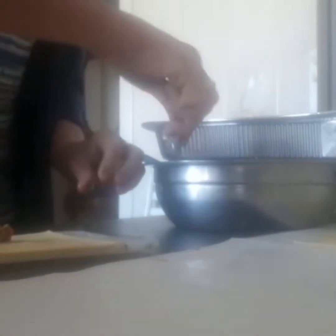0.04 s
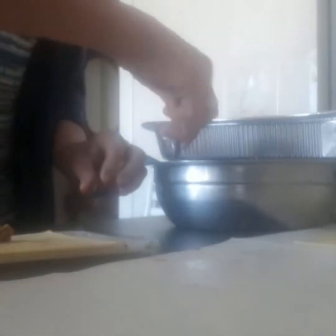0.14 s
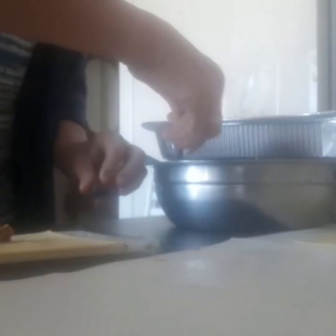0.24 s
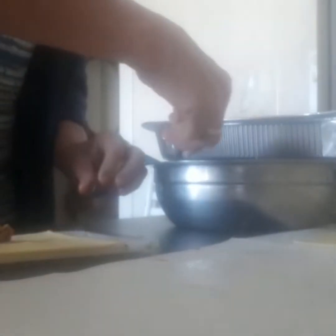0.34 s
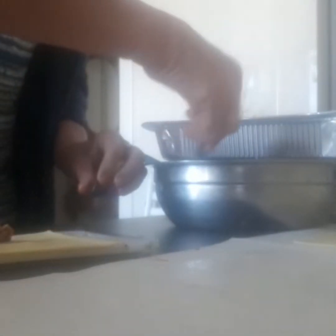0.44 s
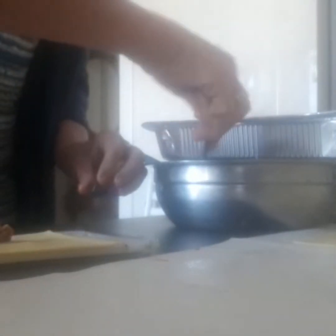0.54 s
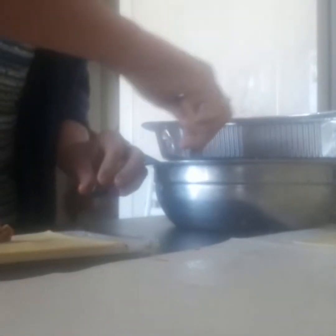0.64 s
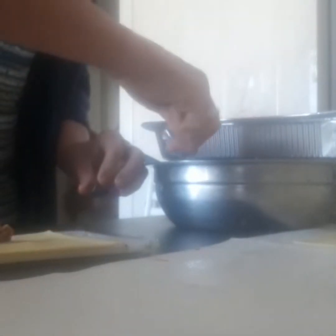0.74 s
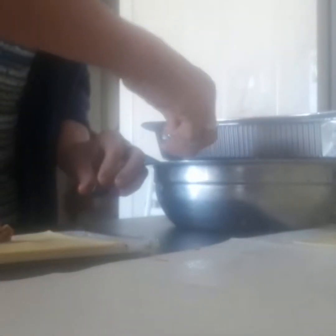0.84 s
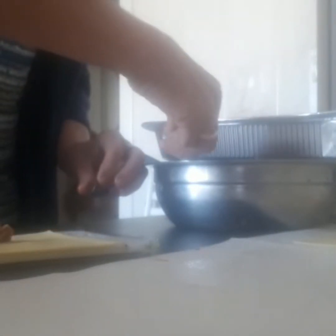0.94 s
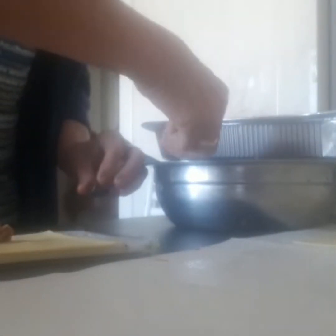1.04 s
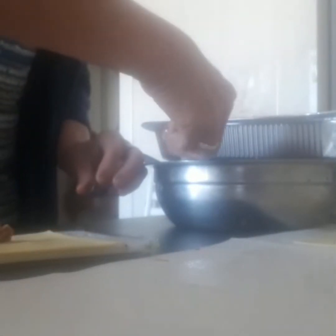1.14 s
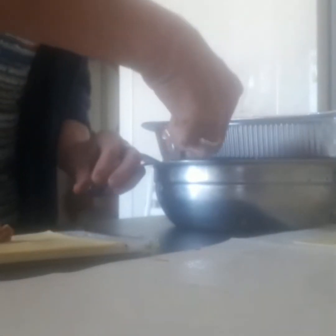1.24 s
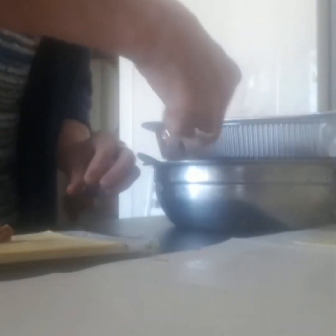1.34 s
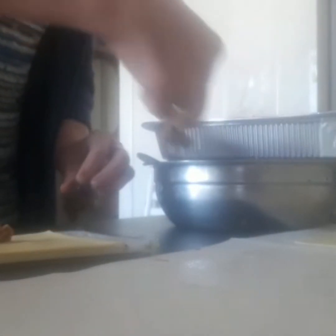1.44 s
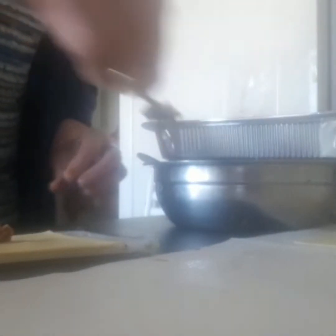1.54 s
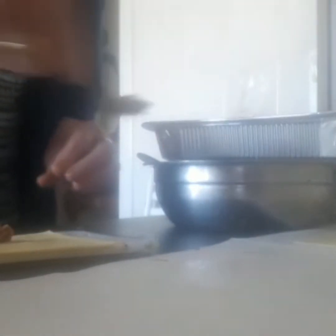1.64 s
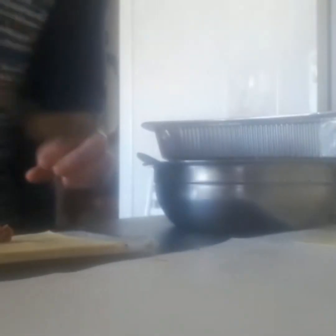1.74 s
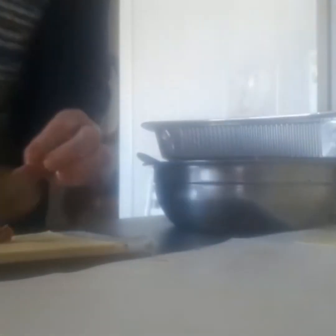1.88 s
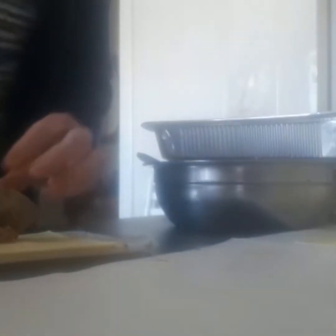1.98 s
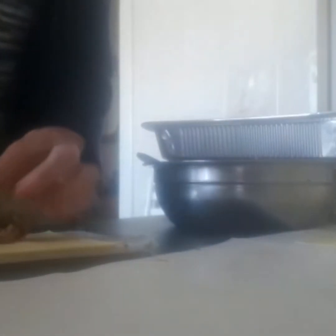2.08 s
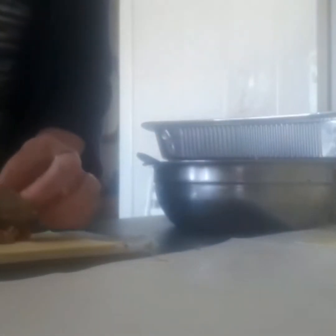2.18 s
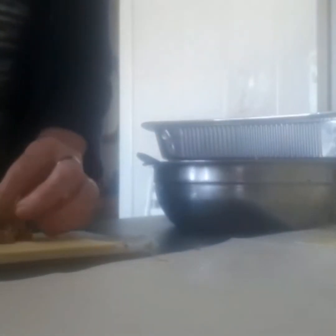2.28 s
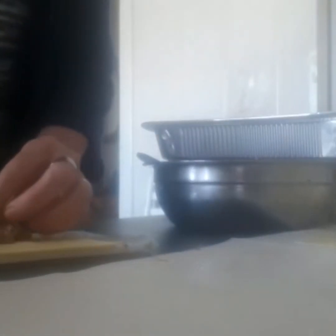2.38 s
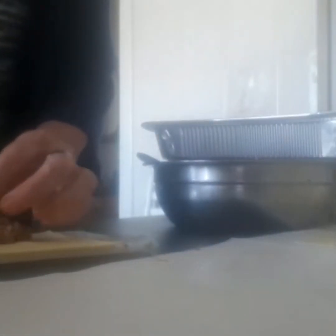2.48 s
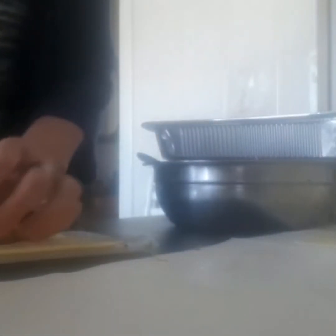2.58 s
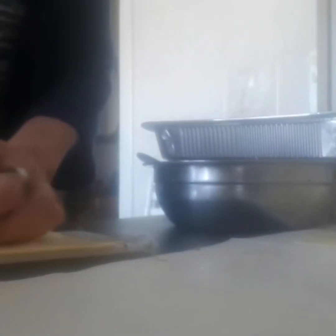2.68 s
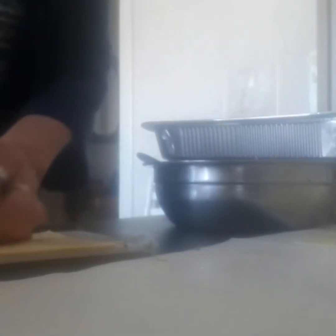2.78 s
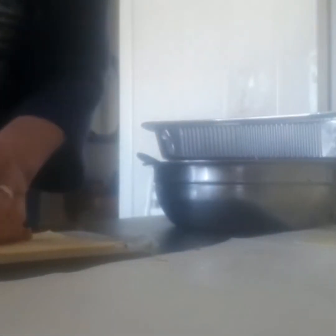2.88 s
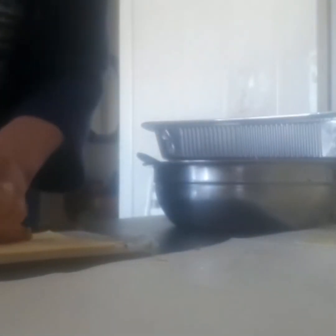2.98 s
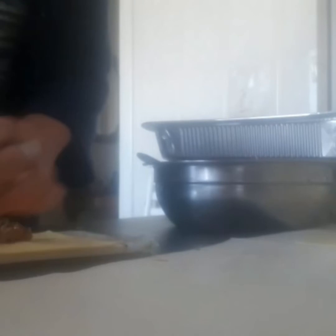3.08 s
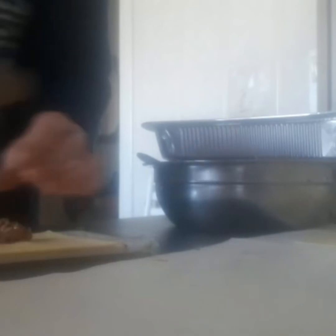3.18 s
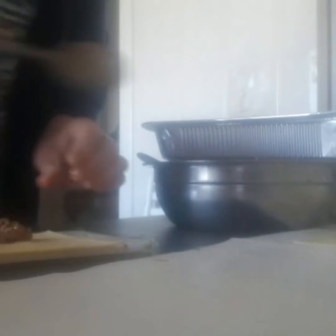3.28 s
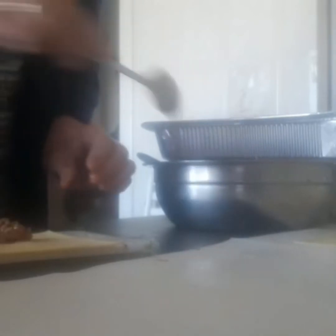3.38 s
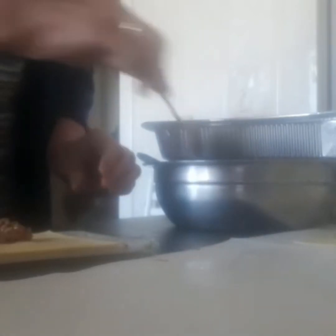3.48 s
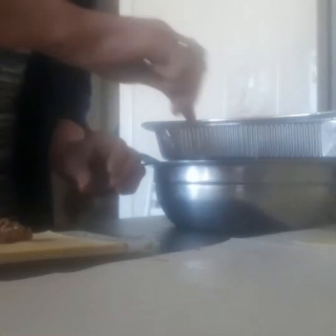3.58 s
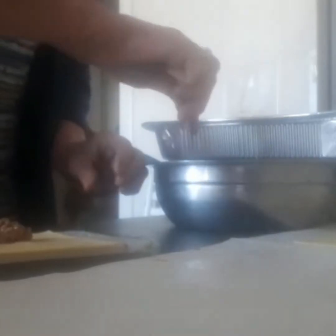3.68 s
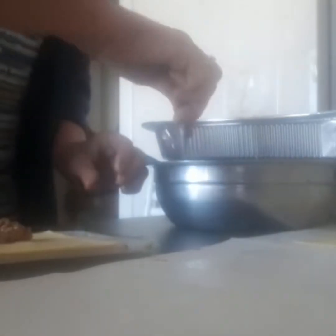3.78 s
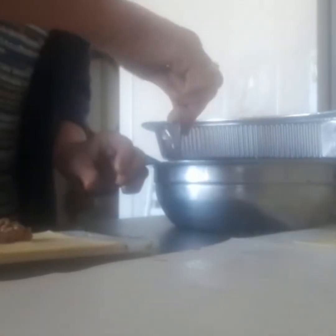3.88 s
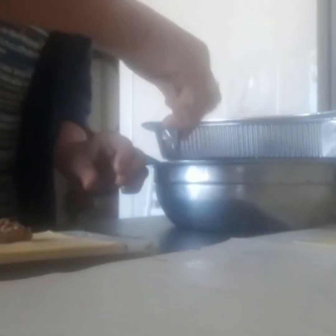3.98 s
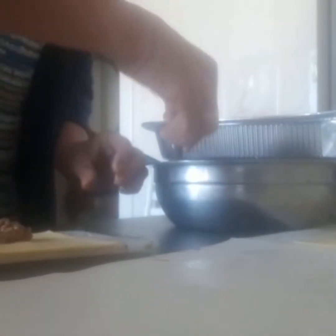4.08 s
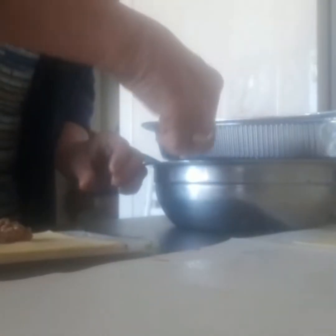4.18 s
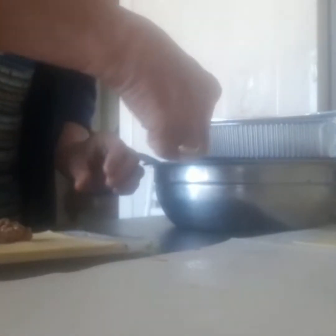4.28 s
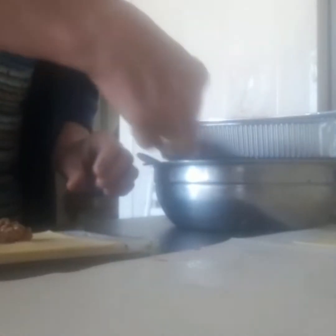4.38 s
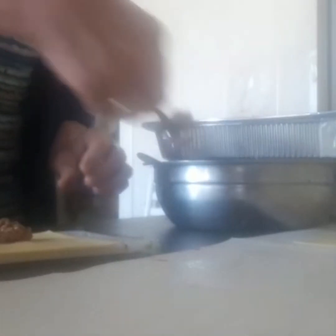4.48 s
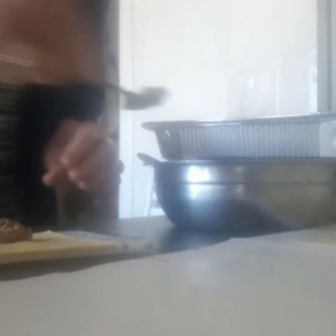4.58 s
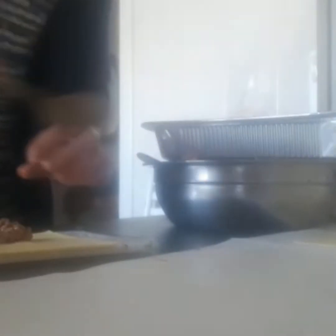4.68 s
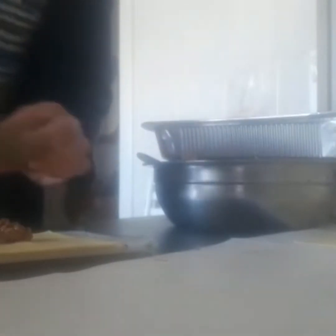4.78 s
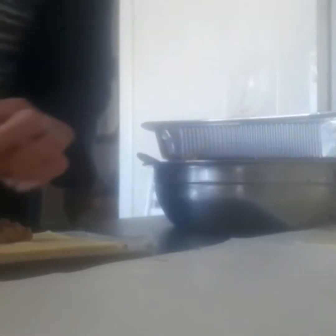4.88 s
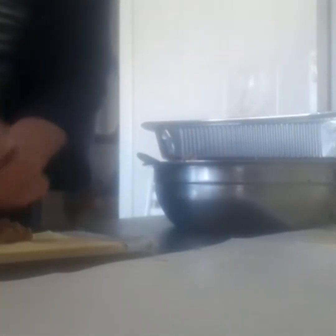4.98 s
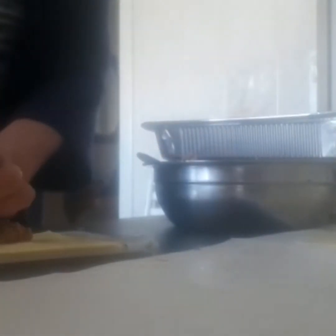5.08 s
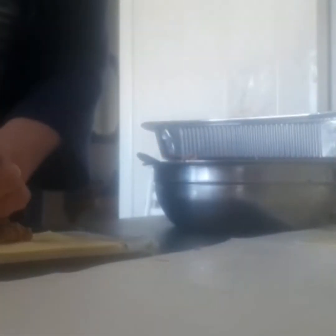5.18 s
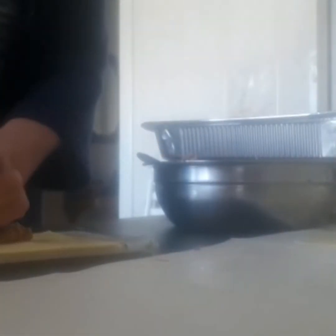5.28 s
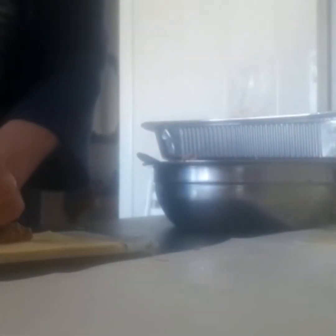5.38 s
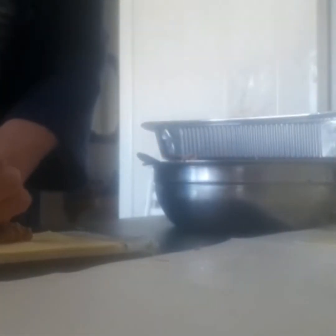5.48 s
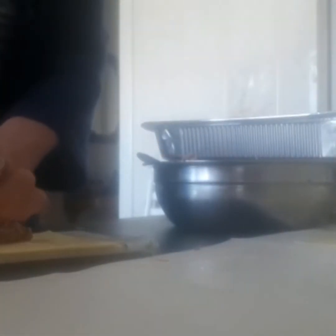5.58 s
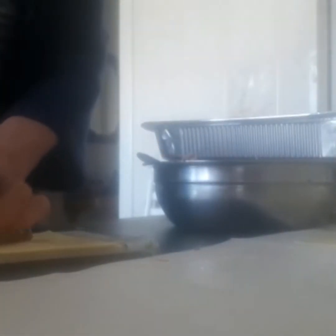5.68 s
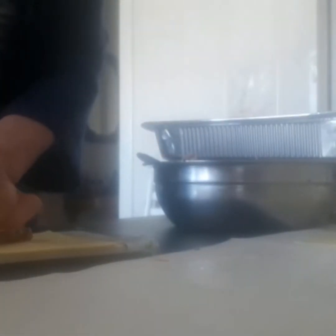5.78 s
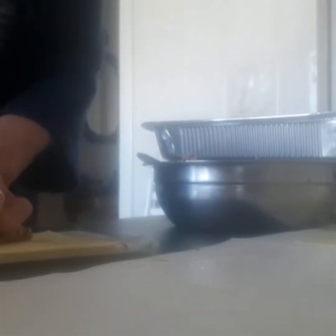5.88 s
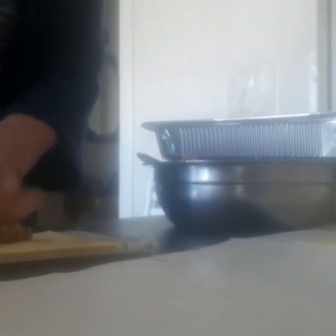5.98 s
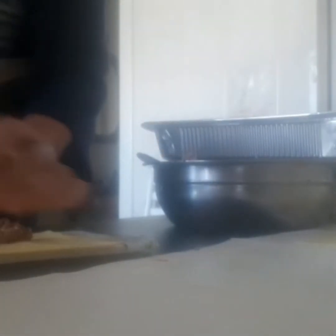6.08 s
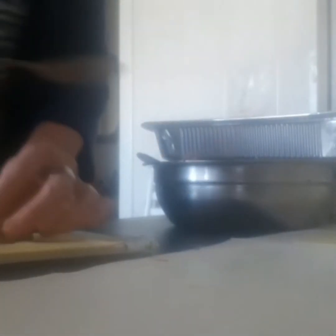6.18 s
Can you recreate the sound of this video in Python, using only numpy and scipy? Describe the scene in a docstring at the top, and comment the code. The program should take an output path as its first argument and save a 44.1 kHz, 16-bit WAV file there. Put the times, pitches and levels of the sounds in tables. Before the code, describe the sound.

A close stereo pickup in a small, briefly echoing kitchen, with a steady low motor hum, soft rumble and thin hiss throughout. At 0 s a slight scrape and knock is heard; at 0.1 s a short squealing rasp leads into the hardest knock, at about 0.18 s: crackling foil, ringing tray wall and a hollow floor boom. A light tap at 0.6 s precedes more chattering scrapes and a medium knock near 0.7 s, then a strong one at 0.95 s. From 1.5 to 3.6 s it is quiet, with faint sticky ticks around 1.7, 2.0 and 2.8 s and barely audible falling whistles. The second scoop begins at 3.77 s with a light scrape, then squealing rasps, clanky knocks and soft counter bumps around 3.9-4.2 s. Afterwards the hum remains, with small wet snaps near 5.1, a very faint one at 5.4, and a clearer one at 5.8 s with a thin whistle.

```python
"""In a small kitchen, a metal spoon scoops food twice from a foil tray resting on a steel bowl.
Slips of the spoon edge make each scrape chatter and squeal; knocks crackle the foil, ring the wall and boom
the tray floor, with soft bumps through the counter. Faint wet ticks, puffs of banded noise, follow each scoop.
Thin sliding whistles are heard mostly as echo; a hum of steady tones and a bed of noise run throughout."""
import sys
import numpy as np
from scipy import signal
from scipy.fft import rfft, irfft
from scipy.io import wavfile

SR = 44100
rng = np.random.default_rng(int(sys.argv[2]) if len(sys.argv) > 2 else 0)


def transcribe(u):
    """Save the signal u as a 16-bit wav file named by the first command-line argument.

    u: samples, shape (n,) or (channels, n), limited to [-1, 1]; the rate is SR.
    q: integer samples, one column per channel.
    """
    v = np.clip(np.atleast_2d(u).T, -1, 1)
    q = np.round(v * 32767).astype(np.int16)
    wavfile.write(sys.argv[1], SR, q)


N = 275184


def amp(db):
    """Turns decibels into gain."""
    return 10 ** (np.asarray(db) / 20)


def unit(x):
    """Scales a sound to rms 1."""
    return x / np.sqrt(np.mean(x ** 2) + 1e-20)


def read(points, hz):
    """Joins table points by straight lines on a log-frequency axis."""
    point_hz, value = np.transpose(points)
    return np.interp(np.log(hz + 1), np.log(point_hz), value)


def add(mix, start_s, sound):
    """Mixes a sound in at a time, cut off at the end of the mix."""
    part = mix[max(round(start_s * SR), 0):][:len(sound)]
    part += sound[:len(part)]


def colour(x, points, tilt_db=0):
    """Shapes x with a spectrum, tilted about 2 kHz and level below 1 kHz, at rms 1."""
    hz = np.fft.rfftfreq(len(x), 1 / SR)
    octaves = np.log2(np.maximum(hz, 1000) / 2000)
    gain = amp(read(points, hz) + tilt_db * octaves)
    return unit(irfft(rfft(x) * gain, len(x)))


def resonance(x, centre_hz, width):
    """Keeps what rings in one steep resonance of a given relative width, at rms 1."""
    hz = np.fft.rfftfreq(len(x), 1 / SR)
    response = 1 / (1 + 2j * (hz / centre_hz - 1) / width) ** 2
    return unit(irfft(rfft(x) * response, len(x)))


def drift(size, rate):
    """Joins random values, rate of them a second, by straight lines."""
    knots = rng.standard_normal(int(size / SR * rate) + 3)
    return np.interp(np.arange(size) * rate / SR, np.arange(len(knots)), knots)


def ring(modes, t, place_db=0, stretch=0):
    """Sums dying modes; where the spoon lands changes their strength and bends their pitch a little."""
    total = np.zeros(len(t))
    for hz, db, t60 in modes:
        place, bend = rng.uniform(-1, 1, 2)
        decay = amp(db + place_db * place - 60 * t / t60)
        total += decay * np.sin(2 * np.pi * hz * (1 + stretch * bend) * t)
    return total


# spectrum of the room air, overall level set in air(): pitch_hz, relative_level_db (per Hz)
AIR_SPECTRUM = [(28, -32), (55, -5.5), (105, -0.5), (160, -4), (270, -11), (450, -9.5), (650, -19.5),
                (1000, -27), (2000, -30), (5000, -36), (15000, -37.5)]


def air(level_db=-62, shared_below_hz=700):
    """Low rumble mostly common to both ports, under a thin hiss of their own."""
    common, left, right = (rfft(colour(rng.standard_normal(N), AIR_SPECTRUM)) for _ in range(3))
    hz = np.fft.rfftfreq(N, 1 / SR)
    share = .93 / (1 + (hz / shared_below_hz) ** 2)  # common part of the power
    return amp(level_db) * irfft(np.sqrt(share) * common + np.sqrt(1 - share) * np.array([left, right]), N)


# orders of the appliance motor: pitch_hz, level_db (before the left-right lean)
HUM_ORDERS = [(48.1, -65), (96.2, -69), (144.3, -66), (192.4, -57), (240.5, -76), (336.7, -77),
              (384.8, -58), (481, -76), (529.1, -71.5)]


def hum(wander_rad=.12, lean_db=-0.12, lag_s=0.00045):
    """Orders of a compressor motor, wandering in phase; they reach the right port a moment later."""
    t = np.arange(N) / SR - np.array([[0], [lag_s]])
    lines = np.zeros((2, N))
    for hz, db in HUM_ORDERS:
        phase = 2 * np.pi * (hz * t + rng.random()) + wander_rad * drift(N, 1.1)
        lines += amp(db) * unit(np.sin(phase))
    return lines * amp([[lean_db], [-lean_db]])


# faint falling whistles: start_s, start_pitch_hz, fall (share of the pitch), level_db (before the mix)
CHIRP_EVENTS = [(1.53, 5100, 0.33, -78), (2.24, 4300, .16, -78.5), (2.72, 3630, 0.037, -81),
                (3.599, 4960, 0.066, -84), (5.81, 4920, 0.18, -77)]


def chirps(length_s=.15, waver=0.019, waver_per_fall=0.29):
    """Thin whistles that slide down and level off; the steeper the slide, the less steady."""
    out, size = np.zeros(N), int(length_s * SR)
    slide = np.sin(np.linspace(0, np.pi / 2, size)) ** 2
    for start_s, start_hz, fall, db in CHIRP_EVENTS:
        unsteady = 1 + (waver + waver_per_fall * fall) * drift(size, 810)
        hz = start_hz * (1 - fall * slide) * unsteady
        whistle = np.hanning(size) * np.sin(2 * np.pi * np.cumsum(hz) / SR)
        add(out, start_s, amp(db) * unit(whistle))
    return out


# wet ticks of food: start_s, level_db (before the onset-and-decay shape), centre_hz, width_octaves
TICK_EVENTS = [(1.69, -67.5, 2400, .3), (1.977, -65, 6066, 0.54), (2.736, -63, 6950, 0.62),
               (2.844, -58.5, 8960, .4), (5.088, -59.5, 4252, .13), (5.125, -57, 6700, 0.11),
               (5.41, -73, 6200, .1), (5.814, -53, 6700, 0.12), (5.836, -64.5, 1800, 0.27)]


def ticks(rise_s=0.0017):
    """Small sticky snaps of food, each a quick puff of noise in one band."""
    out, t = np.zeros(N), np.arange(SR // 10) / SR
    hz = np.fft.rfftfreq(len(t), 1 / SR) + 1
    shape = t / rise_s * np.exp(1 - t / rise_s)
    for start_s, db, centre_hz, width in TICK_EVENTS:
        band = np.exp(-.5 * (np.log2(hz / centre_hz) / width) ** 2)
        puff = unit(irfft(rfft(rng.standard_normal(len(t))) * band, len(t)))
        add(out, start_s, amp(db) * puff * shape)
    return out


# soft bumps through the counter: start_s, level_db (peak at the source)
BUMP_EVENTS = [(.17, -42), (.707, -39.5), (.745, -53), (4.005, -44.5), (4.066, -38.5), (4.125, -43.5)]


def bumps(pitch_hz=88, length_s=.036):
    """The push of the spoon passes through the bowl into the counter as a short low swell."""
    out, t = np.zeros(N), np.arange(int(length_s * SR)) / SR
    for start_s, db in BUMP_EVENTS:
        add(out, start_s, amp(db) * np.hanning(len(t)) * np.sin(2 * np.pi * pitch_hz * t))
    return out


# strokes of the spoon along the foil: start_s, end_s, final_pressure_db, swell_db, tilt_db_per_octave,
# squeal_hz, squeal_db (relative to pressure), rib_hz, rib_db (relative to the rasp)
SCRAPE_STROKES = [(0, 0.01, -30, -5.5, -1, 1710, 3.5, 3150, -4.5),
                  (0.1, 0.169, -28.5, 8.5, 0, 1242, 1.5, 4320, -7.5),
                  (.645, .706, -42, 20.5, -1.5, 1750, 0.5, 2420, -9.5),
                  (0.717, 0.784, -31, 3.5, -1, 1270, -1, 2880, -12.5),
                  (0.855, 0.935, -34.5, 2, .5, 1222, -3.5, 3900, -9.5),
                  (3.772, 3.8, -35, 1.5, 0.5, 3180, -13.5, 3100, -12),
                  (3.911, 3.999, -34.5, 13, -.5, 1229, -0.5, 4350, -13),
                  (4.162, 4.199, -28, 15, 0, 1076, -16.5, 2960, -7.5)]
# spectrum of the foil under a sliding spoon: pitch_hz, relative_level_db (per Hz)
RASP_SPECTRUM = [(120, -24), (260, -13), (345, -1), (480, -13.5), (800, -9), (1230, 0.5), (1450, -8.5),
                 (3100, -13.5), (5500, -21), (7500, -13), (8600, -28), (13000, -25), (16000, -33)]


def scrapes(slips_per_s=1600, slip_spread_db=1.5, uneven_db=2.0, catches_per_s=160, bite=.3, waver=.045,
            squeal_flutter_db=4, release_s=0.0019, attack_share=.1, swell_curve=1.6, rib_width=0.32):
    """Tiny slips of the spoon edge shake the foil and the rib under it; where they lock to a mode it squeals."""
    out, t = np.zeros(N), np.arange(SR // 5) / SR
    for start_s, end_s, final_db, swell_db, tilt_db, squeal_hz, squeal_db, rib_hz, rib_db in SCRAPE_STROKES:
        length_s = max(end_s - start_s, release_s)
        # pressure builds, quickly at first, until the spoon slips free
        slack_db = -swell_db * np.maximum(1 - t / length_s, 0) ** swell_curve
        catch = drift(len(t), catches_per_s)  # the edge catches and lets go on the creases
        sizes = amp(slip_spread_db * np.minimum(rng.exponential(1, len(t)), 4))
        signs = rng.choice([-1, 1], len(t))
        happens = rng.random(len(t)) < slips_per_s / SR
        slips = sizes * signs * happens * amp(uneven_db * catch)
        # the rasp grows faster with pressure than the squeal does
        foil = colour(slips, RASP_SPECTRUM, tilt_db)
        rib = amp(rib_db) * resonance(slips, rib_hz, rib_width)
        rasp = (foil + rib) * amp(bite * slack_db)
        turns = np.cumsum(squeal_hz * (1 + waver * drift(len(t), 400))) / SR
        squeal = unit(np.sin(2 * np.pi * turns) * amp(squeal_flutter_db * catch))
        attack = 1 - np.exp(-t / (attack_share * length_s))
        release = np.exp(-np.maximum(t - length_s, 0) / release_s)
        pressure = attack * release * amp(final_db + slack_db)
        add(out, start_s, pressure * (rasp + amp(squeal_db) * squeal))
    return out


# spoon knocks on the tray: start_s, level_db, floor_boom_db, foil_crackle_db (added to crackle_db below),
# crackle_tilt_db_per_octave
KNOCK_EVENTS = [(.009, -29, -6.5, 4, 0), (0.1755, -7.5, 0, 0.5, -1), (.596, -42, 5.5, 7.5, -5),
                (.7109, -26, 0.5, 6, 0), (0.9491, -14, -0.5, 1, -2), (3.776, -32.5, 3.5, 6.5, -4.5),
                (3.971, -25, -15.5, -7.5, 2), (4.0181, -15, -1, 2, -3.5), (4.075, -34.5, 2.5, 1, -2.5),
                (4.1413, -17.5, -3, -0.5, -4)]
# tray floor modes that outlast the boom: pitch_hz, level_db (for the hardest knock), t60_s
FLOOR_MODES = [(208, -13.5, 0.12), (258, -17, .06), (348, -26.5, 0.44), (340.8, -31.5, 0.23)]
# tray wall and spoon modes: pitch_hz, level_db (both varied a little at each bounce), t60_s
WALL_MODES = [(438.84, -26, .1), (543, -26.5, 0.13), (930, -21, .032), (980, -26, .06), (1147, -23, 0.1),
              (1128, -6, 0.049), (1253.5, -7, .036), (1809, -24.5, 0.13), (1980, -26.5, 0.065),
              (3180, -24.5, 0.033), (3684, -16, 0.056)]
# spectrum of the dense modes of crumpled foil: pitch_hz, relative_level_db (per Hz)
FOIL_SPECTRUM = [(50, -46), (150, -25.5), (400, -3.5), (700, -4), (1200, 4.5), (1500, -7), (1900, 4),
                 (2500, -4.5), (3200, -7), (4500, -5.5), (5400, -11), (7500, -12.5), (8600, -19),
                 (15000, -24.5)]


def knocks(snap=1.0, snap_s=0.0009, buckle_s=0.0057, crackle_db=-7.0, shiver_db=-10, shiver_t60=0.11,
           boom_hz=368, boom_sag=.07, light_sag=.22, flex_s=0.027, light_flex_s=0.026, flex_range_db=4.5,
           ring_growth=.6, bounce_s=0.0044, bounce_db=-4.0):
    """The foil snaps, buckles in a short crackle and shivers on while the wall rings and the floor booms."""
    out, t = np.zeros(N), np.arange(SR // 2) / SR
    # the narrow wall radiates no bass, the rest of the thin sheet little
    wall_cut = signal.butter(3, 400, "highpass", fs=SR, output="sos")
    sheet_cut = signal.butter(2, 170, "highpass", fs=SR, output="sos")
    shiver = amp(shiver_db - 60 * t / shiver_t60)
    crackle_shape = snap * np.exp(-t / snap_s) + np.exp(-(t / buckle_s) ** 4) + shiver
    hardest_db = max(row[1] for row in KNOCK_EVENTS)
    for start_s, db, boom_db, foil_db, tilt_db in KNOCK_EVENTS:
        # the floor swings up as the spoon flexes it, then the food drags its pitch down and chokes it;
        # a hard knock flexes it longer, holds its pitch and leaves it ringing
        force = np.clip(1.5 + (db - hardest_db) / flex_range_db, 0, 1)
        flex = np.minimum(t / (light_flex_s + force * (flex_s - light_flex_s)), 1)
        sag = light_sag + force * (boom_sag - light_sag)
        boom_turns = np.cumsum(boom_hz * (1 - sag * flex ** 2)) / SR
        boom = np.sin(np.pi * flex) * np.sin(2 * np.pi * boom_turns)
        floor = boom + amp(ring_growth * (db - hardest_db)) * ring(FLOOR_MODES, t)
        # the spoon bounces on the wall, more weakly each time
        wall = np.zeros(len(t))
        for k, late in enumerate(rng.uniform(.7, 1.2, size=3)):
            add(wall, k * late * bounce_s, amp(k * bounce_db) * ring(WALL_MODES, t, place_db=2.0, stretch=0.064))
        crackle = colour(rng.standard_normal(len(t)), FOIL_SPECTRUM, tilt_db) * crackle_shape
        sheet = amp(boom_db) * floor + amp(crackle_db + foil_db) * crackle
        knock = signal.sosfilt(wall_cut, wall) + signal.sosfilt(sheet_cut, sheet)
        add(out, start_s, amp(db) * knock)
    return out


# phase between the two microphone ports: pitch_hz, left_lead_rad
PORT_PHASE_CURVE = [(100, 1.7), (250, 0), (950, 1.95), (1090, 0.5), (1290, 1.7), (1700, 4), (2600, 0.64),
                    (3400, 1.5), (4700, 0.95), (5400, 2), (6800, 1), (8500, -3), (11500, -1), (15000, -3)]
# level between the two microphone ports: pitch_hz, left_minus_right_db
PORT_BALANCE_CURVE = [(200, 1.5), (460, -2.5), (680, 7.5), (1020, 3.5), (1210, 7), (1400, -2.5), (1700, 14),
                      (2000, 3), (2900, 6), (8500, 6), (13000, 10.5)]


def ports(x):
    """Direct sound reaches the two ports with different phase and level, split evenly between them."""
    hz = np.fft.rfftfreq(2 * N, 1 / SR)
    half = amp(read(PORT_BALANCE_CURVE, hz) / 2) * np.exp(.5j * read(PORT_PHASE_CURVE, hz))
    return irfft(rfft(x, 2 * N) * np.array([half, 1 / half]), 2 * N)[:, :N]


# how long the kitchen echoes: pitch_hz, t60_s
ROOM_DECAY = [(200, 0.28), (400, .5), (1400, 0.2967), (3700, 0.36), (7500, 0.2953), (13000, 0.22)]
# how loud it echoes, before the early treble lift and left-right lean: pitch_hz, echo_level_db
ROOM_LEVEL = [(200, -4), (350, -10.5), (700, -1), (1200, -6), (3000, -4.5), (12000, -3.5)]


def kitchen(x, first_s=.005, taps_per_s=4000, shared_below_hz=600, early=0.55, early_s=0.0094):
    """Echoes from counter and walls, each band dying at its own speed; the bass is alike in both ports."""
    signs = rng.choice([-1., 1.], (2, SR))
    taps = signs * (rng.random((2, SR)) < taps_per_s / SR) / np.sqrt(taps_per_s)
    hz, t, bands = signal.stft(taps, SR, nperseg=256)
    same = 1 / (1 + (hz / shared_below_hz) ** 4)[:, None]
    bands = np.array([bands[0], same * bands[0] + np.sqrt(1 - same ** 2) * bands[1]])
    t60 = read(ROOM_DECAY, hz)[:, None]
    even_energy = np.sqrt(2 * np.log(1000) / t60)  # keeps the echo level independent of its length
    decay = amp(read(ROOM_LEVEL, hz)[:, None] - 60 * t / t60) * even_energy
    # bowl and counter throw the treble back first
    nearby = 1 + early * (1 - same) * np.exp(-t / early_s)
    tail = signal.istft(bands * decay * nearby, SR, nperseg=256)[1]
    tail = np.pad(tail, ((0, 0), (int(first_s * SR), 0)))
    return signal.fftconvolve(x[None], tail, axes=1)[:, :N]


def scene(echo_lean_db=1, chirp_echo_db=3):
    """Tray and food close by, chirps mostly as echo, hum and air behind."""
    far = chirps()
    near = ticks() + bumps() + scrapes() + knocks()
    echo = kitchen(near + amp(chirp_echo_db) * far) * amp([[echo_lean_db], [-echo_lean_db]])
    return air() + hum() + echo + ports(near + .5 * far)


def record(dry, ceiling=.95, edge_hz=15850):
    """The input rounds off the hardest peaks; then a low-pass limits the band."""
    rounded = dry / (1 + (dry / ceiling) ** 8) ** (1 / 8)
    lowpass = signal.firwin(511, edge_hz, window=("kaiser", 9), fs=SR)
    return signal.oaconvolve(rounded, lowpass[None], "same")


dry = scene()
out = record(dry)
transcribe(out)
```